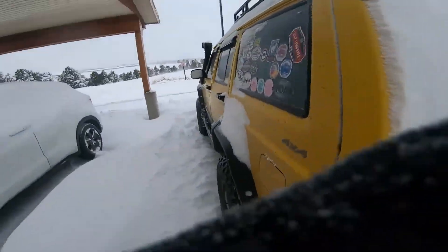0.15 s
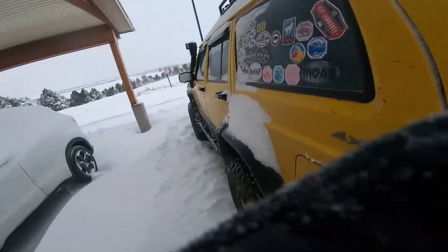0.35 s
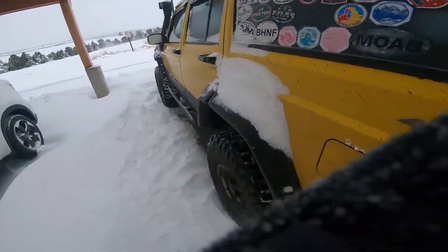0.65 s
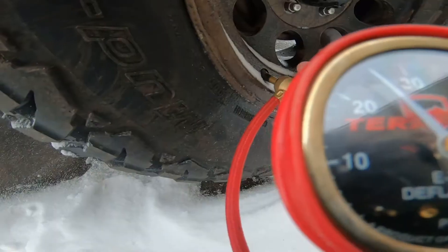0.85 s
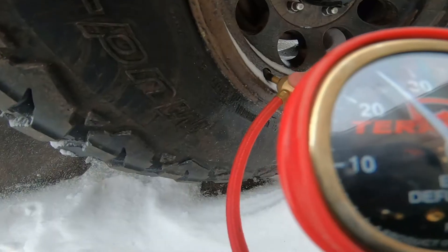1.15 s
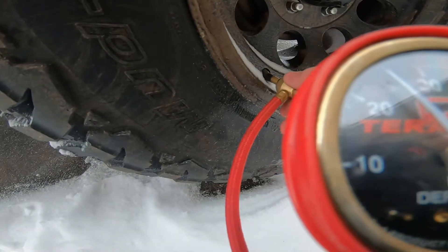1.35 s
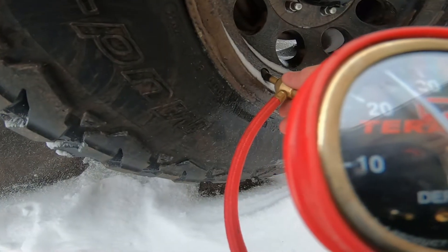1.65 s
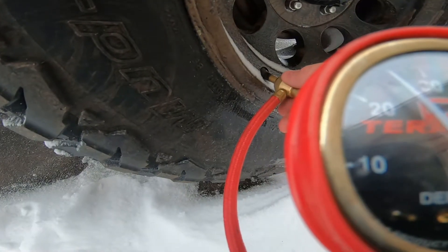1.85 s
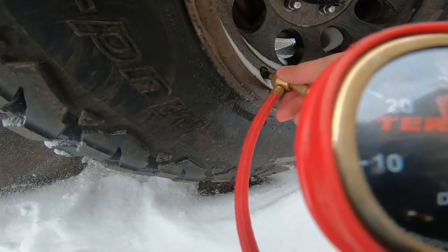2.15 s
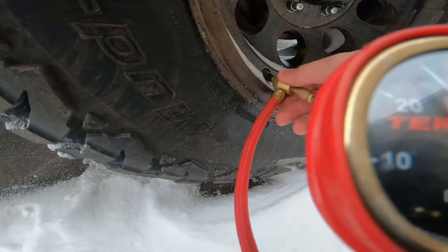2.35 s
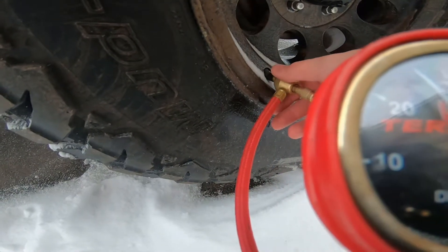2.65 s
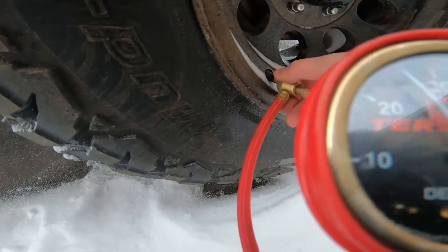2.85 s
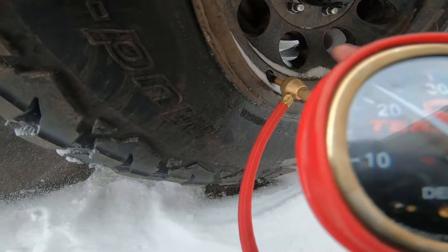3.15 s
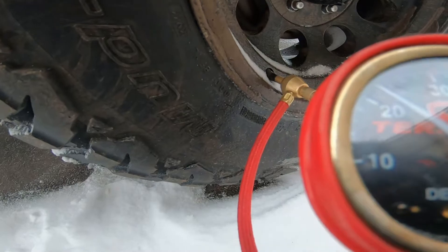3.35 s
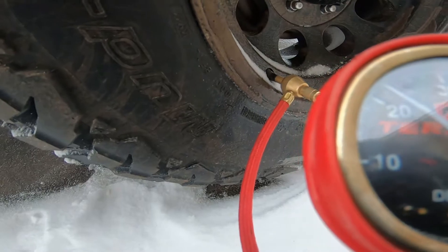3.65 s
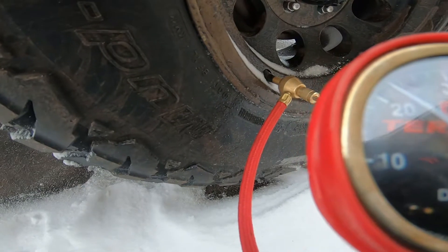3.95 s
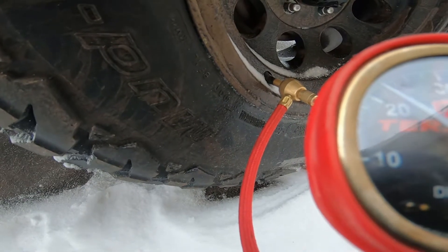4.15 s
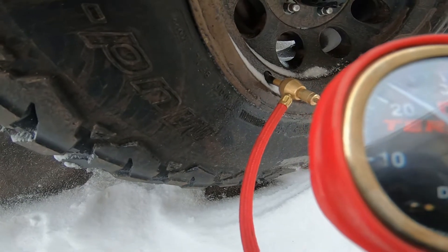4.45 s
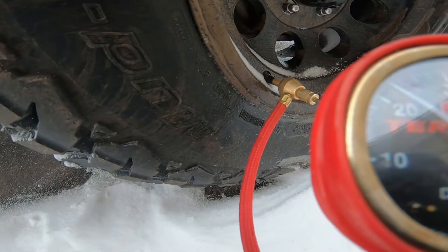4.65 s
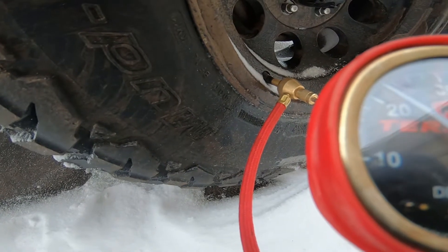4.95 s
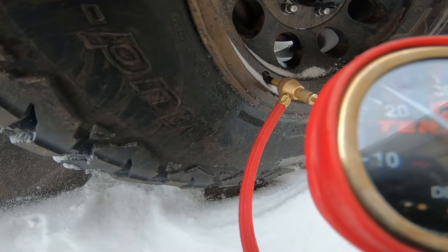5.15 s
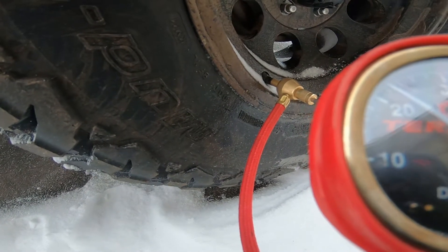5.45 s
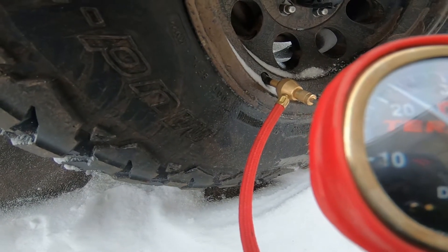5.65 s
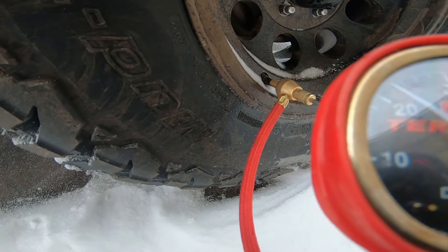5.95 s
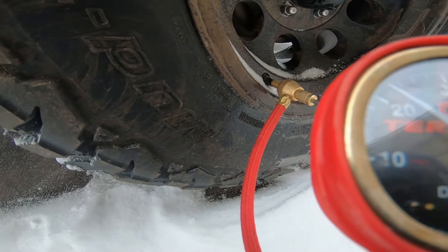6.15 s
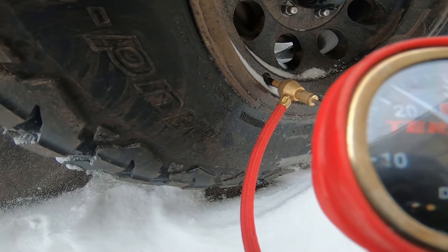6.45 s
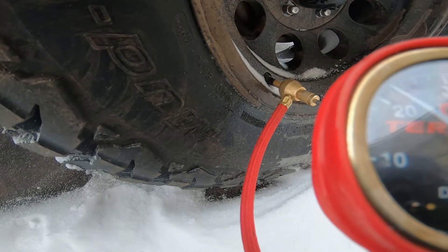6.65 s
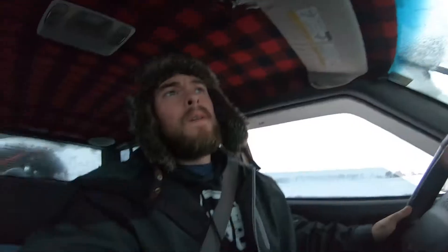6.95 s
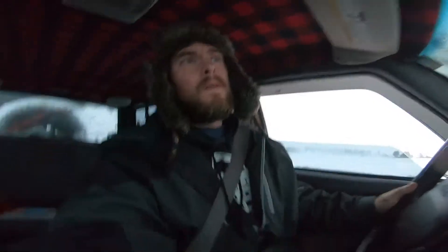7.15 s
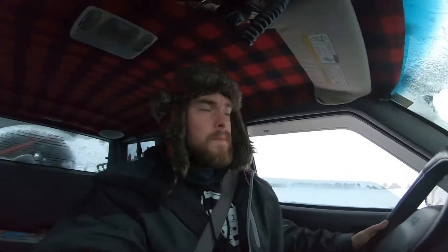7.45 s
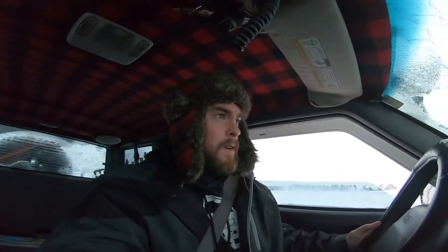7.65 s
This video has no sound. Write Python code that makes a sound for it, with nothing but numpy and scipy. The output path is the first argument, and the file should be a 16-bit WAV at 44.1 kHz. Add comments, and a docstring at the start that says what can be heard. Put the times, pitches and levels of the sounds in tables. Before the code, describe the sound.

Half a second of packed snow squeaking and crunching, then thumps and metal clicks as a hand handles a valve. Air rushes out close to the microphone for about a second and a half, pauses, then rushes again for four seconds, wider and sharper. An engine idles softly underneath. Wind thuds as the hiss turns duller, and a hard cut leads into a moving vehicle's deep rumble, with a tiny rustle and knocks.

```python
"""Beside a vehicle in snow, its six-cylinder engine idling, a tyre is aired down through a brass deflator.
Snow crunches as shaped noise and the fitting clicks as struck modes; the engine is sines and noise.
The valve opens twice: the jet is resonant noise, first under a hand, which then draws back from the vent.
Low noise bursts buffet the microphone as the jet swings away and dulls.
The scene cuts to the moving vehicle's cabin: boomy rumble, a rustle and knocks."""
import sys
import numpy as np
from scipy import signal
from scipy.fft import rfft, irfft
from scipy.io import wavfile

SR = 44100
rng = np.random.default_rng(int(sys.argv[2]) if len(sys.argv) > 2 else 0)


def pcm_store(signal):
    """Save signal as 16-bit PCM."""
    levels = np.round(np.clip(np.atleast_2d(signal), -1, 1) * 32767)
    wavfile.write(sys.argv[1], SR, levels.astype(np.int16).T)


N = 343980
TIME = np.arange(N) / SR
BINS_HZ = np.maximum(np.fft.rfftfreq(N, 1 / SR), 1)

# Strength of each firing in the engine cycle. Each entry: level in dB.
CYLINDER_DB = [0.86, -0.091, 0.93, -0.73, 1, -0.89]
# Stereo width of sounds from ahead. Each row: frequency in Hz, side minus mid in dB.
AHEAD_WIDTH = [(100, -64.5), (3000, -95), (8000, -54), (10000, -21), (12000, -7), (15000, -0.5)]
# Stereo width of sounds from around. Each row: frequency in Hz, side minus mid in dB.
AROUND_WIDTH = [(100, -29), (500, -28.5), (1200, -18), (2800, -26), (5000, -13.5), (8000, -6.5),
                (15000, -20)]


def from_db(db):
    """Decibels to gain."""
    return 10 ** (np.asarray(db) / 20)


def rms_one(x):
    """Scale to rms 1."""
    return x / np.sqrt(np.mean(x ** 2) + 1e-20)


def in_time(rows):
    """Join (s, value) rows into a curve at every sample."""
    return np.interp(TIME, *np.transpose(rows))


def at_bins(points):
    """Join (Hz, value) rows into a spectrum at every bin, on a log frequency axis."""
    hz, values = np.transpose(points)
    return np.interp(np.log(BINS_HZ), np.log(hz), values)


def drift(rate_hz):
    """Slow random signal, low-passed noise of rms 1."""
    noise = rfft(rng.standard_normal(N))
    return rms_one(irfft(noise / (1 + (BINS_HZ / rate_hz) ** 2), N))


def colour(x, spectrum, modes=()):
    """Pass x through a broad spectrum with resonances or notches on it; rms 1."""
    db = at_bins(spectrum)
    for hz, width_hz, peak_db in modes:
        db = db + peak_db / (1 + (2 * (BINS_HZ - hz) / width_hz) ** 2)
    return rms_one(irfft(rfft(x) * from_db(db), N))


def turbulence(spectrum, width, modes=()):
    """Coloured stereo noise from a shared part and a left-right difference."""
    mid, side = colour(rng.standard_normal((2, N)), spectrum, modes)
    side = irfft(rfft(side) * from_db(at_bins(width)), N)
    return np.array([mid + side, mid - side])


def narrow(hz, half_width_hz):
    """Noise in one resonance with steep skirts; rms 1."""
    edges_hz = [max(hz - half_width_hz, 30), hz + half_width_hz]
    band = signal.butter(2, edges_hz, "band", fs=SR, output="sos")
    return rms_one(signal.sosfilt(band, rng.standard_normal(N)))


def ring(x, hz, t60_s):
    """Two-pole resonator: a unit click sets a decaying sine of initial height 1 ringing."""
    radius = from_db(-60 / (t60_s * SR))
    angle = 2 * np.pi * hz / SR
    poles = [1, -2 * radius * np.cos(angle), radius * radius]
    return signal.lfilter([0, np.sin(angle)], poles, x + 1e-18)


def ramp(start_s, length_s):
    """Gain that grows from 0 to 1 with the square of the time since start."""
    return np.clip((TIME - start_s) / length_s, 0, 1) ** 2


def swell(start_s, end_s, rise_s, fall_s):
    """Envelope that grows up to start, holds at 1 until end and dies away; rise and fall are time constants."""
    before = (start_s - TIME) / rise_s
    after = (TIME - end_s) / fall_s
    return np.exp(-np.clip(np.maximum(before, after), 0, 30))


def burst(start_s, rise_s, decay_s):
    """Envelope of one blow: exponential rise and decay, at most half a second long."""
    first, out = round(start_s * SR), np.zeros(N)
    age = TIME[:min(N - first, SR // 2)]
    out[first:first + len(age)] = (1 - np.exp(-age / rise_s)) * np.exp(-age / decay_s)
    return out


def changeover(moment_s, span_s):
    """Gains of the old and the new state in a smooth change of constant power."""
    share = .5 + .5 * np.tanh((TIME - moment_s) / (2 * span_s))
    return np.sqrt(1 - share), np.sqrt(share)


def scuffs(rows, grit, half_width_hz):
    """Short contacts: a pitched core with grit around it."""
    out = 0
    for start_s, db, decay_s, hz, grit_db in rows:
        # longer contacts have a purer pitch; half_width_hz holds for a decay of 10 ms
        core_width_hz = min(half_width_hz * np.sqrt(.01 / decay_s), hz / 2)
        core = narrow(hz, core_width_hz)
        out = out + from_db(db) * burst(start_s, 0.0006, decay_s) * (core + from_db(grit_db) * grit)
    return out


def cabin(grain_db=2.0, knock_half_width_hz=200):
    """Road rumble booms in the closed cabin; something loose rustles and knocks."""
    # Road rumble. Each row: frequency in Hz, relative level in dB per Hz.
    rumble_spectrum = [(12, -1.5), (20, -1), (40, 2), (100, -6), (180, -14), (330, -18), (450, -31.5),
                       (800, -37.5), (1100, -47.5), (2500, -54), (3800, -57), (5500, -70.5), (9000, -82.5),
                       (14000, -94.5)]
    # Boom and whines. Each row: frequency in Hz, width in Hz, peak in dB.
    rumble_modes = [(134.2, 18.6, 14), (1464, 130, 11.5), (6500, 250, 6)]
    # Stereo width. Each row: frequency in Hz, side minus mid in dB.
    cabin_width = [(100, -71), (3000, -35), (8000, -20), (14000, -6.5)]
    # Rubbing of loose things. Each row: frequency in Hz, relative level in dB per Hz.
    rub_spectrum = [(400, -1), (1250, 7), (2300, -1), (3600, 3.5), (5500, -3), (10000, -11), (12000, -34.5),
                    (15000, -48)]
    # Knocks of loose things. Each row: start in s, level in dB, decay in s, pitch in Hz, grit in dB re core.
    knocks = [(7.142, -54, .003, 3900, -6), (7.205, -34.5, 0.0085, 1270, -14), (7.221, -38, .005, 1350, -9),
              (7.234, -45.5, .007, 3400, -3), (7.255, -38, .003, 3550, -9)]
    start_s, fade_s, rumble_db = 7.098, 0.07, -15.5
    rustle_s, rustle_db, rustle_rise_s, rustle_fall_s = 7.238, -44.5, .018, .018

    rumble = turbulence(rumble_spectrum, cabin_width, rumble_modes)
    rumble = from_db(rumble_db) * ramp(start_s, fade_s) * rumble
    rub = rms_one(turbulence(rub_spectrum, cabin_width) * from_db(grain_db * drift(300)))
    rustle = from_db(rustle_db) * swell(rustle_s, rustle_s, rustle_rise_s, rustle_fall_s) * rub
    return rumble + rustle + scuffs(knocks, rub, knock_half_width_hz)


def valves(firings, stroke_firings=0.63):
    """Each tappet clatters once a cycle, for a fraction of a firing interval."""
    # Tappets. Each row: place in firings after the loud one, relative level in dB, pitch in Hz, half-width in Hz.
    tappets = [(0, -22.5, 1700, 200), (.15, -21.5, 2040, 537.7), (1.85, -25.5, 2570, 239),
               (3.85, -26, 2625, 238)]
    loud_stroke_s = 2.428   # moment of one loud tappet stroke
    since = firings - np.interp(loud_stroke_s, TIME, firings)
    count = len(CYLINDER_DB)
    out = 0
    for place, db, hz, half_width_hz in tappets:
        offset = (since - place + count / 2) % count - count / 2
        out = out + from_db(db) * narrow(hz, half_width_hz) * np.exp(-(offset / stroke_firings) ** 2)
    return out


def engine(exhaust_db=-0.5, rough_db=0.5, puff_db=-7.5, throb_db=-1.0, lope_db=-0.3, valves_db=-3.0,
           bay_db=-45.0, whine_db=-52.5, whine_order=35.8):
    """Firing-locked sines and throbbing puffs make the exhaust; valves clatter, the bay hums, a pulley whines."""
    # The idle sags once and recovers. Each row: time in s, rate in firings per s.
    speed = [(0, 39.5), (.8, 38.7), (1.6, 39.8), (2.45, 39.2), (3.0, 39.2), (6.9, 39.1)]
    # Loudness as the microphone moves about. Each row: time in s, relative level in dB.
    idle = [(0.05, -25), (0.73, -25), (0.99, -20), (2.96, -19.5), (3.87, -26.5), (6.5, -27), (6.8, -28)]
    # Exhaust note. Each row: multiple of the firing rate, relative level in dB.
    exhaust = [(1, 3.5), (2, 4.5), (3, -8), (4, -20), (5, -17), (6, -18.5), (7, -22), (8, -32)]
    # Exhaust puffs. Each row: frequency in Hz, relative level in dB per Hz.
    puff_spectrum = [(40, 0.5), (90, 3.5), (125, 7.5), (200, -4.5), (300, -13.5), (450, -16), (700, -25),
                     (1500, -73.5)]
    # Engine bay noise. Each row: frequency in Hz, relative level in dB per Hz.
    bay_spectrum = [(300, 7), (800, 5), (1400, 5.5), (2000, 3.5), (2600, 1.5), (3500, -3.5), (5000, -12.5),
                    (6500, -20.5), (10000, -29), (12000, -42), (16000, -47.5)]
    # Faint ringing under the bonnet. Each row: frequency in Hz, width in Hz, peak in dB.
    bay_modes = [(2620, 370, -2), (7200, 600, 5), (9600, 400, 6)]

    rate = in_time(speed) * (1 + 0.0036 * drift(12))
    firings = np.cumsum(rate) / SR
    count = len(CYLINDER_DB)
    strength_db = np.interp(firings, np.arange(count), CYLINDER_DB, period=count)
    note = rms_one(sum(from_db(db) * np.sin(2 * np.pi * round(k) * firings) for k, db in exhaust))
    note = note * from_db(strength_db + rough_db * drift(25))

    throb = np.cos(2 * np.pi * firings)
    lope = np.cos(2 * np.pi * firings / count)   # once per cycle
    puffs = turbulence(puff_spectrum, AHEAD_WIDTH) * rms_one(from_db(throb_db * throb + lope_db * lope))
    running = note + from_db(puff_db) * puffs + from_db(valves_db) * valves(firings)
    running = from_db(in_time(idle) + exhaust_db) * running

    bay = turbulence(bay_spectrum, AROUND_WIDTH, bay_modes)
    whine = np.sin(2 * np.pi * whine_order * firings + .8 * drift(25))
    whine = rms_one(whine * from_db(2.2 * drift(20)))
    return running + from_db(bay_db) * bay + from_db(whine_db) * whine


def breeze(gust_db=2.5):
    """Air over the microphone ports: lumpy low noise, unrelated on the two sides, and short buffets."""
    # Gusts. Each row: start in s, end in s, level in dB, fall in s.
    gusts = [(0, 0.295, -31.5, 0.047), (3.2, 5.6, -46, .1), (5.88, 6.22, -29.5, .22)]
    # Buffets. Each row: start in s, level in dB.
    bumps = [(6.01, -33), (6.139, -16.5), (6.225, -22), (6.281, -18.5), (6.402, -16), (6.505, -21),
             (6.538, -20.5), (6.621, -23.5), (6.695, -30)]
    # Buffet colour. Each row: frequency in Hz, relative level in dB per Hz.
    bump_spectrum = [(20, -3), (60, 6.5), (130, 4.5), (220, -0.5), (400, -10), (600, -15.5), (1200, -25),
                     (4000, -60.5)]
    # Stereo width of the buffets. Each row: frequency in Hz, side minus mid in dB.
    wind_width = [(50, -5.5), (200, -15), (600, -3), (3000, -12.5)]
    gust_rise_s, bump_rise_s, bump_decay_s = .12, 0.0028, 0.027

    lump_spectrum = [(20, 12.0), (80, 6.5), (160, 0), (300, -7), (600, -13), (2000, -58)]   # Hz, dB per Hz
    lumps = colour(rng.standard_normal((2, N)), lump_spectrum)
    wind = sum(from_db(db) * swell(start, end, gust_rise_s, fall) for start, end, db, fall in gusts)
    blows = sum(from_db(db) * burst(start, bump_rise_s, bump_decay_s) for start, db in bumps)
    return lumps * wind * from_db(gust_db * drift(8)) + turbulence(bump_spectrum, wind_width) * blows


def crouching(weave_db=-2.0, thump_half_width_hz=95):
    """Someone crouches: a sleeve swishes as fluttering noise and a hand knocks the microphone."""
    # Cloth. Each row: frequency in Hz, relative level in dB per Hz.
    cloth_spectrum = [(800, -22), (1800, -13), (3200, 1), (6500, 0), (8000, -2), (10200, -6), (11500, -22),
                      (14000, -22), (15500, -34)]
    # Sleeve swishes. Each row: start in s, end in s, level in dB.
    swishes = [(0, 0.002, -48), (0.112, 0.155, -39)]
    # Dull hand knocks. Each row: start in s, level in dB, decay in s, pitch in Hz, grit in dB re core.
    thumps = [(.628, -32.5, .01, 240, -34), (.6405, -19, 0.013, 170, -28), (.649, -30, .009, 300, -31),
              (.667, -30, .01, 350, -27)]
    rise_s, fall_s = .01, .034
    cloth = rms_one(turbulence(cloth_spectrum, AROUND_WIDTH) * from_db(weave_db * drift(400)))
    strokes = sum(from_db(db) * swell(start, end, rise_s, fall_s) for start, end, db in swishes)
    return strokes * cloth + scuffs(thumps, cloth, thump_half_width_hz)


def snow(grain_db=2.0, squeak_half_width_hz=170, creak_half_width_hz=110, creak_ramp_s=0.02, settle_s=0.028):
    """Grains rub under pressure; packed layers give way in short squeaky crunches and creak as weight settles."""
    # Snow grains. Each row: frequency in Hz, relative level in dB per Hz.
    snow_spectrum = [(200, 8), (550, 5), (900, 0), (1400, 11.5), (2500, 5), (4000, 6), (5500, -3),
                     (7500, 2.5), (10200, -9), (11800, -18), (14000, -25), (15500, -27)]
    # Weight presses the snow down. Each row: peak time in s, relative level in dB, rise in s, fall in s.
    presses = [(.243, -36, .012, 0.05), (.37, -40.5, 0.016, 0.046), (.435, -40, 0.023, .04),
               (.476, -34.5, .008, .012)]
    # Packed snow gives way. Each row: start in s, level in dB, decay in s, pitch in Hz, grit in dB re core.
    crunches = [(.226, -35, 0.0035, 1510, -6), (.2358, -19, 0.0025, 1390, -0.5),
                (.2995, -23, 0.0044, 1470, -17), (.3485, -19.5, 0.0042, 1450, -8),
                (.368, -34, 0.007, 1600, -15)]
    creak_start_s, creak_end_s, creak_db, creak_hz = .43, 0.494, -36.5, 1350

    grit = rms_one(turbulence(snow_spectrum, AROUND_WIDTH) * from_db(grain_db * drift(500)))
    pressure = sum(from_db(db) * swell(peak, peak, rise, fall) for peak, db, rise, fall in presses)
    pressure = pressure * swell(0, creak_end_s, creak_ramp_s, settle_s)
    creak = swell(creak_start_s, creak_end_s, creak_ramp_s, creak_ramp_s)
    creak = from_db(creak_db) * creak * narrow(creak_hz, creak_half_width_hz)
    return pressure * grit + creak + scuffs(crunches, grit, squeak_half_width_hz)


def fitting(ring_db=-9.5, crack_db=-3.0):
    """Each touch is a dry crack that strikes the brass modes with strengths of its own."""
    # Fitting clicks. Each row: start in s, relative level in dB.
    touches = [(.6285, -38), (.6414, -34), (0.6534, -37), (0.6647, -22.5), (0.676, -25)]
    # Brass modes. Each row: frequency in Hz, relative level in dB, 60 dB decay time in s.
    brass = [(1860, 5, 0.012), (2700, -11, .015), (6440, -8, .015), (6950, -3.5, 0.023), (8000, -14, 0.026),
             (10930, -26, .02)]
    at = [round(start * SR) for start, db in touches]
    rings = np.zeros(N)
    for hz, db, t60_s in brass:
        strikes = np.zeros(N)
        strikes[at] = from_db(np.array(touches)[:, 1] + db + rng.normal(0, 2, len(at)))
        rings += ring(strikes, hz, t60_s) * rng.choice([-1, 1])

    crack_spectrum = [(600, -15), (3000, 16), (8000, -7), (13000, -23), (15000, -37)]   # Hz, dB per Hz
    blows = sum(from_db(db) * burst(start, 0.00029, 0.001) for start, db in touches)
    crack = turbulence(crack_spectrum, AHEAD_WIDTH) * blows
    return from_db(ring_db) * rings + from_db(crack_db) * crack


def valve_flow():
    """The valve lets air out; after it shuts, air left in the fitting drains away."""
    # Valve openings. Each row: opens in s, shuts in s.
    releases = [(0.78, 2.252), (2.973, 7.0)]
    open_s, shut_s = 0.017, .006   # travel time; closing time constant
    drain_db, drain_s = -21, .028
    flow = 0
    for opens_s, shuts_s in releases:
        through_valve = swell(opens_s, shuts_s, open_s, shut_s)
        draining = from_db(drain_db) * swell(opens_s, shuts_s, open_s, drain_s)
        flow = flow + ramp(opens_s, open_s) * np.maximum(through_valve, draining)
    return flow


def air(flutter_db=0.49):
    """One valve feeds a jet of resonant noise; hand and angle set its colour, close reflections ripple it."""
    # Broad colour under the hand. Each row: frequency in Hz, relative level in dB per Hz.
    leak_spectrum = [(100, -1), (300, -17), (550, -8.5), (800, -13.5), (1300, 2.5), (2700, -12.5),
                     (5800, -7.5), (8000, -6.5), (11500, -21), (13500, -18.5), (15700, -27.5)]
    # Broad colour of the open vent. Each row: frequency in Hz, relative level in dB per Hz.
    vent_spectrum = [(100, 4), (300, -28.5), (550, -9), (800, -11.5), (1300, -2.5), (2700, 0), (5800, 0.5),
                     (8000, -6.5), (11500, -10.5), (13500, -9), (15700, -20)]
    # Broad colour off axis. Each row: frequency in Hz, relative level in dB per Hz.
    shaded_spectrum = [(100, -7.5), (300, -17), (550, -14), (800, -7), (1300, 1.4), (2700, 1), (5800, -7),
                       (8000, 2), (11500, -27), (13500, -22), (15700, -46)]
    # Fitting resonances and wheel reflection notches, under the hand, from the open vent and off axis.
    # Each row: frequency in Hz, width in Hz, peak in dB.
    leak_modes = [(1050, 77, -7.5), (1373, 370, -8.5), (2440, 130, 3), (2804, 520, 12), (3600, 200, 6.5),
                  (4900, 360, 2.5), (5430, 130, -4.5), (5940, 830, -10), (8500, 550, -4.5), (9500, 340, -6),
                  (10460, 1200, 5)]
    vent_modes = [(1427, 63, -8), (2050, 150, 6), (2840, 660, 5.5), (4420, 190, -7), (4690, 160, 3.5),
                  (5070, 640, -6), (5480, 170, 4), (6950, 260, 8), (7545, 850, 10), (8560, 260, 6),
                  (8960, 240, 6.5), (9790, 510, 10.5), (10000, 670, 9.5)]
    shaded_modes = [(2060, 290, 6), (2850, 900, 9), (3600, 170, 0.5), (4400, 120, -17.5), (4400, 1130, 8),
                    (6020, 300, -5), (8700, 1300, -5.5), (10150, 450, 9), (11080, 1200, 15),
                    (14340, 1070, -6.5)]
    # Stereo width of the close vent. Each row: frequency in Hz, side minus mid in dB.
    vent_width = [(60, -10), (99, -10), (160, -1.5), (270, 12), (450, -6.5), (740, -2.5), (1220, -9.5),
                  (2010, -12.5), (3330, -16.5), (5500, -8), (6400, -1.5), (7200, -8.5), (8500, 4),
                  (9400, 0), (9900, -4.5), (10600, 2.5), (15000, -3.5)]
    # Lean of the vent jet. Each row: frequency in Hz, left minus right in dB.
    vent_lean = [(300, 1), (1200, 2.5), (3000, 1.5), (5000, 0.5), (5600, -1.5), (6150, 3.5), (6700, -4.5),
                 (7500, -1.5), (8000, -1), (8500, 7.5), (9300, 3), (10000, 4), (11500, -0.5), (14000, 4)]
    # Reflections off the rim and tyre wall. Each row: delay in s, level in dB re direct jet.
    echoes = [(.00176, -29), (.0032, -21.5), (.00413, -29.5), (.0063, -29.5)]
    leak_db, vent_db, shaded_db = -19, -21, -21.5   # full flow; shaded_db at the moment of the swing
    uncover_s, uncover_span_s = 3.06, 0.14   # the hand draws back from the vent
    turn_s, turn_span_s = 6.12, 0.059   # the jet swings away from the microphone
    spill_db, spill_fade_db_per_s = -9.5, 29   # direct jet still heard after the swing
    shaded_rise_db_per_s = 3.5   # the dull hiss keeps growing after the swing

    covered, uncovered = changeover(uncover_s, uncover_span_s)
    facing, turned = changeover(turn_s, turn_span_s)
    since_turn_s = TIME - turn_s
    spill = from_db(spill_db - spill_fade_db_per_s * np.maximum(since_turn_s, 0))

    leak = from_db(leak_db) * covered * turbulence(leak_spectrum, AHEAD_WIDTH, leak_modes)
    vent = turbulence(vent_spectrum, vent_width, vent_modes)
    vent = from_db(vent_db) * uncovered * np.maximum(facing, spill) * vent
    lean_db = at_bins(vent_lean) * np.array([[.5], [-.5]])
    vent = irfft(rfft(vent) * from_db(lean_db), N)
    shaded = turbulence(shaded_spectrum, AHEAD_WIDTH, shaded_modes)
    shaded = from_db(shaded_db + shaded_rise_db_per_s * since_turn_s) * turned * shaded

    jet = valve_flow() * (leak + vent + shaded) * from_db(flutter_db * drift(25))
    reflected = sum(from_db(db) * np.roll(jet, round(delay * SR), axis=1) for delay, db in echoes)
    return jet + reflected


def scene():
    """The sounds at the wheel end abruptly; the cabin fades in."""
    cut_s = 6.916
    outdoors = engine() + breeze() + crouching() + snow() + fitting() + air()
    return outdoors * (TIME < cut_s) + cabin()


def record(dry):
    """Subsonic sway is cut, the highest peaks are rounded, the very top is cut."""
    low_cut_hz, peak_limit, cutoff_hz = 10, .56, 15700
    steady = signal.sosfilt(signal.butter(2, low_cut_hz, "high", fs=SR, output="sos"), dry)
    rounded = steady / (1 + (steady / peak_limit) ** 6) ** (1 / 6)
    return signal.sosfilt(signal.ellip(12, .1, 80, cutoff_hz, fs=SR, output="sos"), rounded)


dry = scene()
out = record(dry)
pcm_store(out)
```